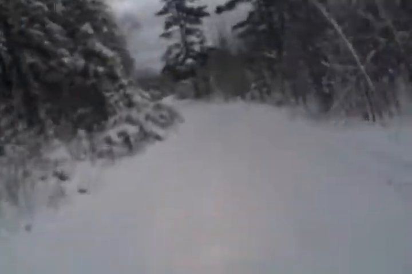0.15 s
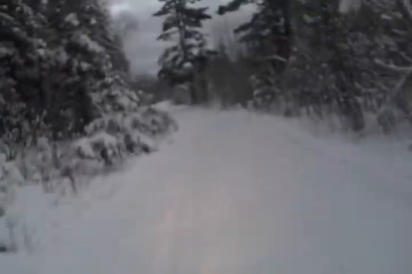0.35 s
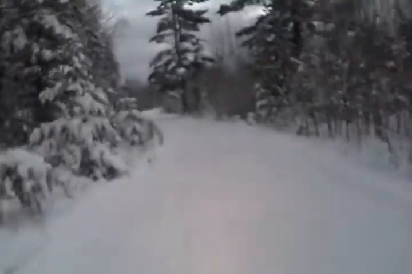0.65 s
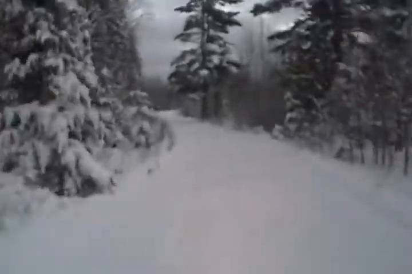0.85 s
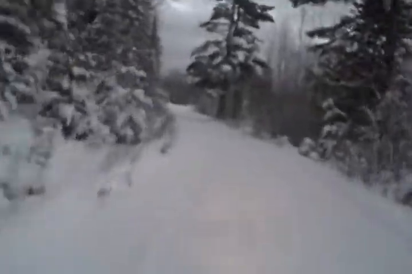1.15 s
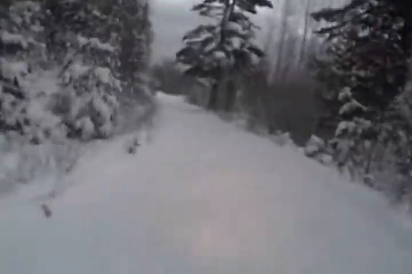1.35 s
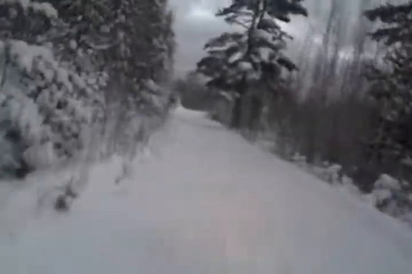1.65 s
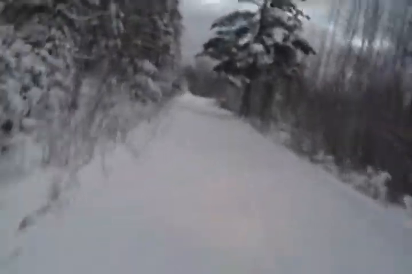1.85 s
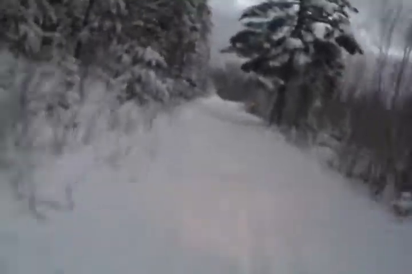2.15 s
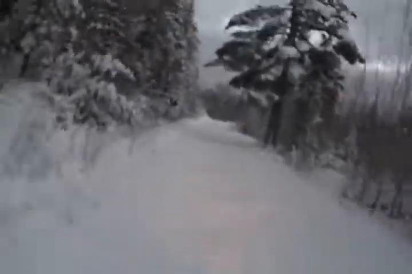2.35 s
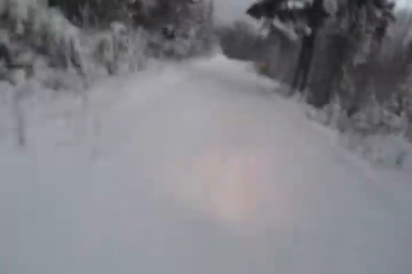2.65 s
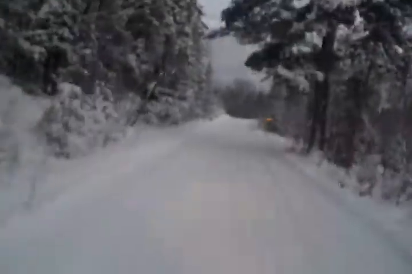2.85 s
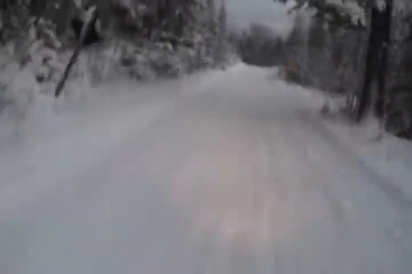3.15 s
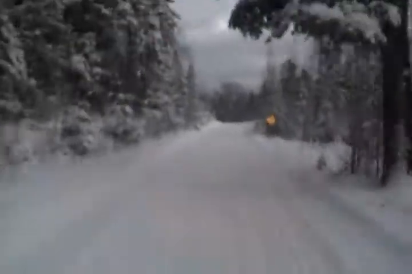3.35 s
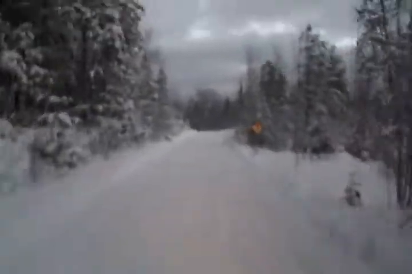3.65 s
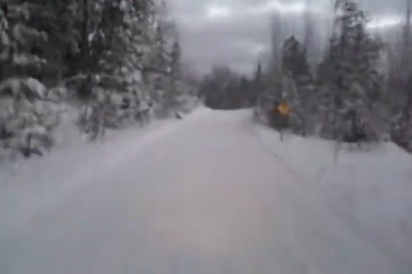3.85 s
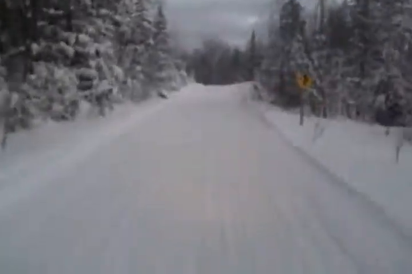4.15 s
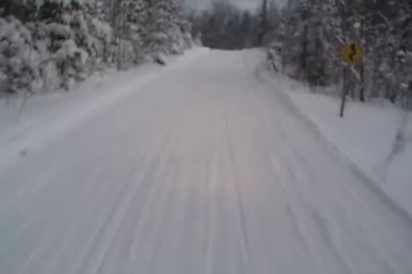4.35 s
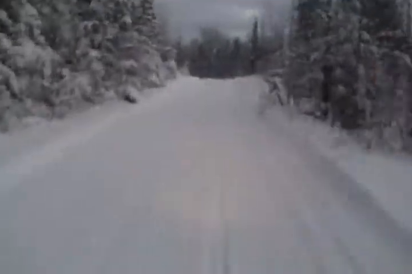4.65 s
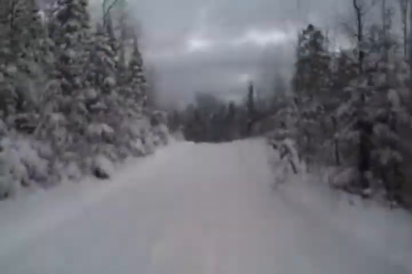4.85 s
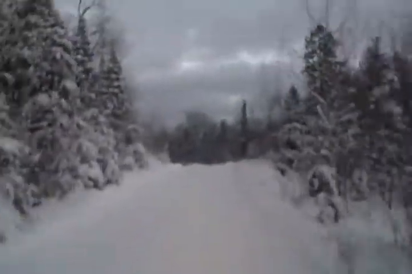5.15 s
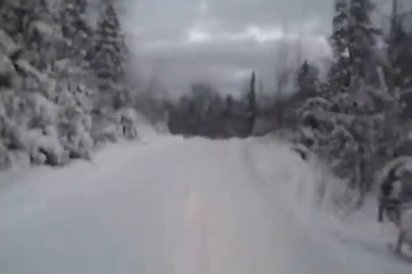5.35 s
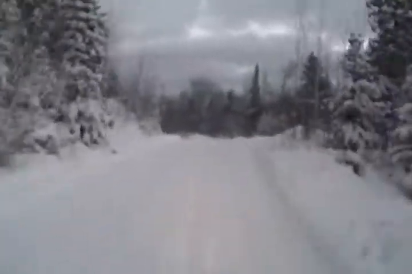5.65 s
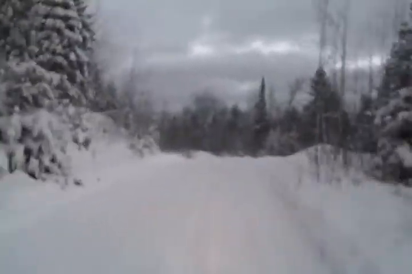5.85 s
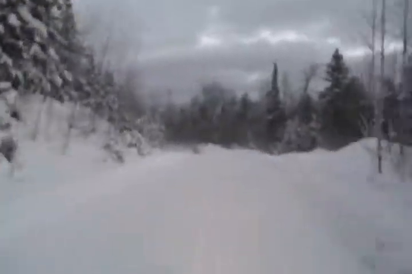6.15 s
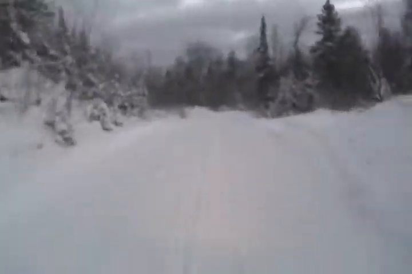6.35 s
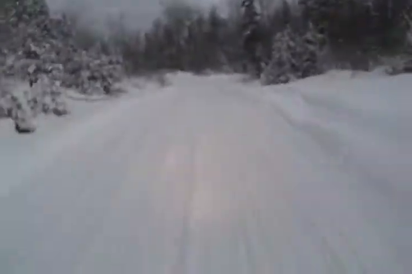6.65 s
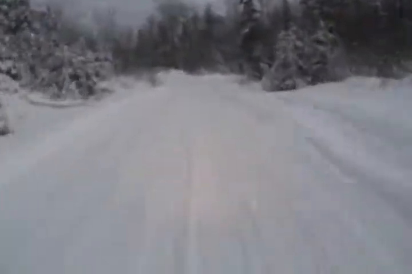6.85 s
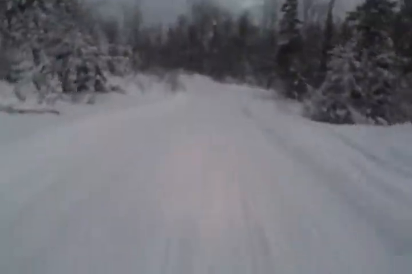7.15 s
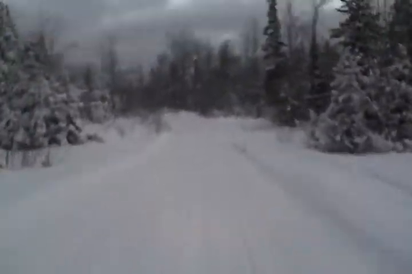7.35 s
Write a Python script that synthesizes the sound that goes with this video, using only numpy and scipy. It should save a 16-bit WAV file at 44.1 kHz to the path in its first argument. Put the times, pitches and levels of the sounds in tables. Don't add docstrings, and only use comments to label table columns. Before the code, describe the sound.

A microphone riding on a snowmobile takes heavy wind from start to finish, 0 to 7.5 seconds. Deep, irregular buffeting and low thuds dominate, with gusts pressing the microphone into short clipped pops and crackles, longest near 3.0 and 3.4 s. Beneath runs a continuous two-stroke engine: a nasal, gritty drone around 100 turns per second with rough exhaust roar, rising in pitch over the first 2 seconds, holding, peaking near 4.7, sagging toward 6.4, then climbing again. The track adds an unsteady low hum, pulsing with bumps and rising until about 4.8. Dull panel knocks come around 2.1 to 2.3, 2.8, 3.25, 5.5 and 6.35. Skis and a metal runner give a thin high hiss, strongest mid-ride. Hard gusts briefly duck the machine, notably 2.2, 2.8, 3.3 and 3.9. Wind thumps thicken after 5.8. It stops mid-ride, outdoors and dry.

```python
import sys
import numpy as np
from scipy import signal
from scipy.fft import rfft, irfft, next_fast_len
from scipy.io import wavfile
from scipy.ndimage import uniform_filter1d

SR = 44100
rng = np.random.default_rng(int(sys.argv[2]) if len(sys.argv) > 2 else 0)


def elevation(decibels):
    levels = np.asarray(decibels, float)
    return 10 ** (levels / 20)


def store_pcm(level_fs):
    pcm = np.round(np.clip(level_fs, -1, 1) * 32767).astype(np.int16)
    wavfile.write(sys.argv[1], SR, np.atleast_2d(pcm).T)


N = 331083

# frequency in Hz, level in dB rms.
CLOCK_TONES = [(1997, -86), (4000, -79), (5001, -99), (6002, -91), (8005, -90), (10006, -108),
               (12009, -103), (14001, -109)]
# frequency in Hz, density in dB per Hz.
CIRCUIT_NOISE = [(300, 4), (2000, 0), (7500, -5), (8500, -10), (9500, -34), (11000, -21), (15600, -21)]

# time in seconds, level in dB.
GUSTS = [(0, -14), (.12, -2.5), (.25, -4.5), (1, 4), (1.4, -0.5), (1.75, 2), (1.9, 4), (2.1, -3.5),
         (2.75, -2), (3.56, -6), (3.95, 3.5), (4.35, -5), (4.7, 4.5), (5.1, 0), (5.5, 0), (6.1, 3.5),
         (6.8, 2), (7.51, 0)]
# frequency in Hz, density in dB per Hz.
BUFFET_SPECTRUM = [(1, -24), (3, -7.5), (5, -3.5), (12, -0.5), (30, -4), (55, -13), (90, -27.5)]
# frequency in Hz, density in dB per Hz.
FLUTTER_SPECTRUM = [(30, -19), (55, 2), (100, -2.5), (150, -8.5), (250, -29.5), (600, -52.5)]
# time in seconds, change in dB.
EDDIES = [(0.033, -4), (0.242, 11), (0.33, -7.5), (0.442, -2), (0.615, -7.5), (0.786, 0.5), (0.905, 0.5),
          (0.96, 3), (1.006, 1.5), (1.235, 1), (1.273, -5), (1.414, 1.5), (1.526, 9.5), (1.779, 4),
          (1.921, 0), (2.039, 2.5), (2.208, -8), (2.376, 4.5), (2.412, -6), (2.498, 5), (2.858, -9),
          (3.349, 0.5), (3.415, 3.5), (3.53, 9.5), (3.694, -5), (3.836, -0.5), (4.027, 1), (4.08, -8),
          (4.186, 5), (4.334, 1), (4.417, 5.5), (4.504, -9), (4.671, 6), (4.85, -2.5), (4.925, 0),
          (5.192, 6.5), (5.276, -2.5), (5.313, 13), (5.435, -1), (5.489, -1.5), (5.674, 7.5), (5.721, -3),
          (5.94, 4.5), (5.977, -3.5), (6.029, -4), (6.074, -3), (6.134, 4.5), (6.438, -7), (6.492, 5),
          (6.528, -2.5), (6.643, 4.5), (6.74, -2.5), (6.781, 5), (6.983, 6), (7.088, -2), (7.304, 5.5),
          (7.38, -3.5), (7.459, 3)]
# time in seconds, peak in dB, frequency in Hz.
BURSTS = [(0.236, -22, 105), (0.477, -22, 137), (0.568, -22.7, 93), (0.679, -23.5, 101), (0.783, -20, 52),
          (0.925, -26, 101), (1.001, -18.9, 82), (1.041, -20, 39), (1.056, -26, 115), (1.233, -26, 58),
          (1.331, -23.4, 137), (1.41, -21, 106), (1.511, -23.6, 120), (1.58, -23.1, 106), (1.709, -29, 60),
          (1.732, -23, 121), (1.766, -21, 44), (1.773, -20.5, 111.5), (2.101, -28, 110), (2.319, -23, 110),
          (2.375, -18, 97.6), (2.498, -25, 60), (2.579, -23.1, 85), (2.642, -18.5, 97), (2.692, -21, 126),
          (2.795, -25.0, 101), (3.045, -25.6, 85), (3.083, -26, 106), (3.161, -24.1, 38.8),
          (3.169, -27, 66), (3.829, -17.5, 43), (4.023, -17.5, 63), (4.148, -26, 101), (4.177, -19, 60),
          (4.236, -22, 106), (4.443, -19.5, 108), (4.675, -25, 68.4), (4.728, -17, 33.2), (4.815, -24, 72),
          (4.887, -29, 137), (5.311, -23, 97), (5.564, -20.1, 77.5), (5.637, -24, 82), (5.793, -21, 126),
          (5.849, -20, 78), (5.89, -25, 46), (5.941, -17.5, 78), (5.986, -20, 37.6), (6.128, -16, 96),
          (6.184, -17.5, 97), (6.357, -18.7, 92), (6.468, -22, 106), (6.492, -16, 55), (6.634, -15.6, 47),
          (6.788, -13.5, 51), (6.86, -16, 48.4), (7.055, -12.5, 52.6), (7.122, -24, 55), (7.238, -23, 94),
          (7.296, -13.5, 55.4)]
# time in seconds, share of full scale.
PRESSURE_CRESTS = [(0, -.39), (.16, .12), (.281, .32), (.44, -.1), (.738, -.25), (1.067, .24), (1.275, .12),
                   (1.373, -.26), (1.456, .33), (1.608, .14), (2.079, 0), (2.154, -.4), (2.374, -.03),
                   (2.465, .41), (2.57, -.07), (2.624, .13), (2.832, -.45), (3.8, .15), (3.908, .24),
                   (4.011, -.45), (4.229, .18), (4.367, -.39), (4.598, .55), (4.795, -.42), (4.948, .59),
                   (5.729, -.45), (5.835, -.16), (6.032, .23), (6.143, -.28), (6.357, -.22), (6.407, .2),
                   (6.47, -.32), (6.599, .17), (6.892, .39), (7.168, .13), (7.295, .17), (7.366, -.03)]
# start in seconds, length in ms, share of the rail (1 = held flat).
RAIL_HITS = [(.083, 5, .93), (0.09, 19, 1), (.11, 2, .95), (0.481, 3, -.97), (0.486, 6, -1), (.494, 3, -1),
             (0.515, 9, -1), (.527, 2, -1), (.536, 4, -1), (0.621, 14, 0.97), (0.827, 13, 0.9),
             (0.973, 9, -1), (.984, 3, -.97), (1.122, 1, -.96), (1.52, 2, -.93), (1.535, 7, -1),
             (1.544, 2, -.97), (1.681, 14, -0.9), (1.798, 17, 1), (1.821, 5, 1), (1.847, 10, 0.85),
             (1.875, 2, .95), (1.957, 31, -1), (1.993, 3, -.97), (1.997, 3, -.95), (2.259, 2, .97),
             (2.266, 1, .94), (2.726, 4, -.95), (2.737, 21, -1), (2.765, 4, -1), (2.943, 4, .97),
             (2.948, 78, 1), (3.027, 6, 1), (3.175, 5, -.98), (3.182, 4, -.9), (3.188, 43, -1),
             (3.232, 9, -1), (3.243, 6, -.96), (3.423, 12, 1), (3.435, 3, .97), (3.44, 59, 1),
             (3.503, 10, 1), (3.651, 33, -1), (5.106, 7, -.95), (5.115, 25, -1), (5.277, 6, .94),
             (5.501, 2, -0.9), (5.508, 5, -.95), (5.572, 10, .85), (5.587, 16, 1), (5.623, 4, .95),
             (5.644, 8, 0.92), (5.764, 2, -.88), (5.933, 4, -.97), (6.223, 14, 1), (6.246, 5, 1),
             (6.685, 11, -0.9), (7.067, 2, -.92), (7.237, 2, -.92), (7.434, 8, 1), (7.455, 5, .9),
             (7.498, 12, 1)]
# time in seconds, gain in dB.
GAIN_DRIFT = [(0, -33.5), (.8, -33), (1.65, -31.5), (2.0, -33.5), (2.75, -32.5), (3.1, -34), (3.75, -37),
              (4.3, -36.5), (5.05, -37), (5.4, -36), (5.56, -30.5), (5.75, -33), (5.95, -32.5), (6.6, -34),
              (6.97, -34.5), (7.2, -31.5), (7.51, -34)]
# time in seconds, depth in dB, recovery in seconds.
GAIN_DIPS = [(.03, -1, 0.13), (.75, 1.5, 0.032), (.93, 0.5, 0.053), (1.884, 2.5, 0.016),
             (2.179, 11.5, 0.02), (2.6, 3, 0.043), (2.831, 9, 0.068), (3.06, 3, 0.073), (3.251, 7.5, 0.12),
             (3.318, 9, 0.025), (3.519, 6.5, 0.065), (3.877, 9, 0.0046), (3.924, 13, 0.0059),
             (4.2, 2, 0.058), (4.524, 3, 0.031), (5.0, 1, 0.023), (5.141, 9.5, 0.05), (5.199, 6, 0.015),
             (5.658, 5.5, 0.029), (6.335, -3, 0.0091), (6.395, 1.5, 0.08), (7.4, 0.5, 0.024)]

# frequency in Hz, density in dB per Hz.
SKI_HISS = [(2500, -13.5), (3800, 5), (4600, -3), (5500, -3.5), (6200, -4.5), (6900, -1.5), (7300, -4),
            (8600, -5.5)]
# frequency in Hz, density in dB per Hz.
RUNNER_SIZZLE = [(5700, -25), (6050, -4), (6250, 0), (6500, -4), (6900, -25)]
# time in seconds, peak in dB, frequency in Hz.
JOLTS = [(1.68, 7.5, 490), (1.92, 3, 508), (2.097, 15.5, 285), (2.32, 14, 269), (2.792, 17, 294),
         (3.186, 5, 622), (3.251, 7, 486), (3.256, 17, 287), (3.285, 18.5, 280), (5.52, 11.5, 195.6),
         (6.349, -3.5, 1065), (6.349, 11, 188)]
# time in seconds, change in dB.
TRAIL_BUMPS = [(0.201, 3.5), (0.341, -6), (0.468, 4), (.63, 2), (0.733, 3.5), (.83, 4), (1.102, 5.5),
               (1.288, 6), (1.365, -10), (1.47, 6), (1.646, -12), (1.759, 5), (1.835, -2), (1.871, -7),
               (2.003, 7.5), (2.061, -10.5), (2.109, 4), (2.222, 5.5), (2.284, -6), (2.32, -1), (2.484, -8),
               (2.655, 4), (2.797, 4), (2.916, 8), (3.127, 2.5), (3.277, 5.5), (3.377, -2.5), (3.625, 6.5),
               (3.777, -4.5), (3.902, 5.5), (3.997, 9), (4.097, -8), (4.174, -3), (4.241, 6), (4.343, 2),
               (4.452, 3), (4.525, -4.9), (4.754, -7), (4.795, 3.1), (4.883, 6.5), (4.974, 2.5),
               (5.212, -12), (5.325, 7.5), (5.65, 4.5), (5.744, 6), (5.845, -7), (5.939, 0.5), (6.013, -18),
               (6.113, 2), (6.354, 4.5), (6.412, -16), (6.512, 1), (6.65, 7), (6.817, 0), (6.876, 3),
               (7.023, -6), (7.19, 8), (7.372, 1.5), (7.417, -6), (7.457, 6.5)]

# time in seconds, crank turns in Hz, track lug rate in Hz.
SPEEDS = [(0.0, 95.6, 221.0), (0.3, 95.6, 222), (0.75, 97.0, 228.8), (1.25, 101.0, 238.3),
          (1.75, 104.1, 244), (2.25, 104.5, 253.4), (2.6, 103.7, 258.5), (3.25, 104.1, 261.7),
          (3.6, 103.5, 267), (4.2, 103.8, 270.8), (4.55, 106, 276.3), (4.8, 106, 277.4), (5.25, 104.1, 275),
          (5.6, 102.2, 274), (6.0, 99.4, 265.5), (6.45, 96.2, 261), (6.85, 98.2, 252.5), (7.4, 101.7, 254)]
# time in seconds, drone in dB, throttle bite in dB per octave, track grip in dB.
LOADS = [(0, -13.5, -0.5, 11.5), (.5, -12.5, -3.5, 8.5), (1, -12.5, 1, 6.5), (1.6, -13, -2.5, 3.5),
         (2, -12, -1, 3), (2.6, -13, -0.5, 1.5), (3.4, -12.5, -2, 1), (4.3, -12.5, -1.5, 4.5),
         (5.4, -13, -1.5, 4), (6, -12.5, -0.5, 5), (6.5, -17.5, 1.5, 5.5), (7, -12.5, 2, -4),
         (7.51, -12.5, -4, 6.5)]
# frequency in Hz, width in Hz, level in dB.
CAN_MODES = [(99.3, 16, 10), (220.4, 50, 11), (381.6, 4.8, 4.5), (554, 4.3, -1.5), (606.5, 10, 2.5),
             (768.5, 64, 3), (803, 140, 1.5), (999, 16, -0.5), (1120, 11, -4.5), (1246, 51, 0),
             (1323, 20, -0.5), (1421, 29, 1.5), (1510, 12, -5.5), (1632, 63, -8), (1720, 12, -6),
             (1730, 40, -10), (1944, 31, -8), (2120, 63, -11.5)]
# frequency in Hz, width in Hz, level in dB.
HOOD_MODES = [(2050, 120, -6.5), (2710, 250, -8.5), (3495, 140, -1.5)]
# frequency in Hz, density in dB per Hz.
ROAR_SPECTRUM = [(100, -3.5), (170, 8.5), (260, 7), (360, 0), (700, -5.5), (1270, -10.5), (1600, -16.5),
                 (2050, -21), (2300, -23.5), (3000, -25), (3500, -31.5), (3900, -36.5), (6000, -39.5)]
# multiple, start and end in seconds, change in dB.
FAVOURED = [(2, .8, 1.6, 5), (2, 2.3, 2.7, -4), (2, 5.6, 5.9, -4), (4, 0, .95, 3), (5, 6.5, 6.8, -4),
            (6, 6.5, 6.8, -4), (5, .9, 1.9, 4), (5, 3.6, 4.9, 6), (6, .9, 1.5, -5), (7, 1.9, 3, 3),
            (7, 3.7, 5.2, 1.5), (7, 5.4, 7.5, -4), (8, .4, 1.3, -4), (8, 1.9, 3.1, -2), (8, 3.7, 4.9, -1),
            (8, 4.9, 5.6, 2), (8, 5.7, 6.4, -4), (6, 5.4, 6, 4), (17, 5.4, 6, -3), (8, 6.9, 7.5, -3),
            (9, 0, .7, -5), (9, 1.2, 5.2, 2), (10, 0, .6, -5), (10, 1.2, 5.2, -11), (10, 5.4, 6.25, 4),
            (10, 6.25, 6.9, 7), (10, 6.9, 7.3, 2), (11, .6, 2.4, 4), (11, 3.3, 4.5, 3), (11, 6.3, 7, 6),
            (11, 7, 7.5, 3), (12, 0, .6, -3), (12, 1, 1.6, 2), (12, 3.6, 4.9, 5), (12, 6.6, 7.2, -4),
            (13, 3.3, 4.5, 4), (13, 5.3, 6, 4), (13, 6.6, 7.5, 3), (14, .3, 1.2, 4), (14, 2.4, 3.6, -6),
            (14, 3.6, 4.2, -4), (14, 6.9, 7.5, -5), (15, 3.9, 5.2, -6), (15, 6.3, 6.9, 4), (16, 0, .6, 5),
            (16, 1, 1.9, -5), (16, 1.9, 4.5, -5), (17, 6, 6.9, 8), (19, .9, 6, -3), (19, 6, 6.7, 7),
            (19, 6.7, 7.5, -3), (20, 6.6, 7.05, 3)]

RAIL, TOP_HZ = .703, 8500
CRUISE_HZ = 250
CONTROL = 20


def unit(x):
    return x / np.sqrt(np.mean(x ** 2) + 1e-20)


def curves(rows):
    s, *cols = np.transpose(rows)
    return [np.interp(np.arange(N) / SR, s, c) for c in cols]


def wobble(rate, hop=1):
    knots = rng.standard_normal(int(N * rate / SR) + 4)
    return np.interp(np.arange(0, N, hop) * rate / SR, np.arange(len(knots)), knots)


def smooth(x, seconds):
    size = int(seconds * SR)
    once = uniform_filter1d(x, size=size, mode="nearest")
    return uniform_filter1d(once, size=size, mode="nearest")


def filtered(x, response):
    m = next_fast_len(N + SR // 2)
    return irfft(rfft(x, m) * response(np.fft.rfftfreq(m, 1 / SR)), m)[..., :N]


def rush(spectrum, patchy_db):
    z = signal.stft(rng.standard_normal(N + SR), nperseg=512)[2]
    field = uniform_filter1d(rng.standard_normal(z.shape), size=5, axis=0)
    field = uniform_filter1d(field, size=10, axis=1)
    noise = signal.istft(z * elevation(patchy_db * unit(field)), nperseg=512)[1][:N]
    f, level = np.transpose(spectrum)

    def colour(hz):
        return elevation(np.interp(np.log(hz + 0.063), np.log(f), level, -120, -120))
    return unit(filtered(noise, colour))


def swells_db(rows, half_length_s):
    s, db = np.transpose(rows)
    strikes = np.bincount((s * SR).astype(int), db, N)
    return smooth(strikes, half_length_s) * int(half_length_s * SR)


def speed_hz():
    return curves(SPEEDS)[1] - CRUISE_HZ


def converter(flat):
    t = np.arange(N) / SR
    tones = sum(np.sqrt(2) * elevation(db) * np.sin(2 * np.pi * hz * t) for hz, db in CLOCK_TONES)
    swing = .25 + .75 * smooth((flat / RAIL) ** 2, .01)
    return swing * (swing * tones + elevation(-80) * rush(CIRCUIT_NOISE, patchy_db=1))


def heave():
    push = .52
    held = [(s + end * ms / 1000, reach * push) for s, ms, reach in RAIL_HITS for end in (0, 1)]
    return smooth(curves(sorted(PRESSURE_CRESTS + held))[0], .02)


def eddies_db():
    return swells_db(EDDIES, 0.027)


def buffet():
    gust_db = curves(GUSTS)[0]
    patches = elevation(0.36 * eddies_db() + 2.4 * wobble(11.0))
    return elevation(17.5 + 0.98 * gust_db) * unit(patches * rush(BUFFET_SPECTRUM, patchy_db=1.5))


def flutter():
    gust_db = curves(GUSTS)[0]
    patches = elevation(0.83 * eddies_db() + 1.8 * wobble(17))
    return elevation(8 + 0.4 * gust_db) * unit(patches * rush(FLUTTER_SPECTRUM, patchy_db=0.5))


def thuds():
    half_cycles, trim_db = 1.67, -1
    out, t = np.zeros(N), np.arange(-4000, 4000) / SR
    for (s, db, hz), start in zip(BURSTS, rng.random(len(BURSTS))):
        swell = np.exp(-(t * hz / half_cycles) ** 2) * np.sin(2 * np.pi * (hz * t + start))
        out[int(s * SR) - len(t) // 2:][:len(t)] += elevation(db + trim_db) * swell
    return out


def snow():
    speed = speed_hz()
    hiss_db, sizzle_db = -29 + 0.0432 * speed, -9.5 + 0.0926 * speed
    hiss = rush(SKI_HISS, patchy_db=1.4)
    sizzle = elevation(sizzle_db) * rush(RUNNER_SIZZLE, patchy_db=2.0)
    return elevation(hiss_db) * (hiss + sizzle)


def chassis():
    out, t = np.zeros(N), np.arange(-2000, 2000) / SR
    for s, db, hz in JOLTS:
        jolt = np.exp(-(t / 0.013) ** 2) * np.sin(2 * np.pi * hz * t)
        out[int(s * SR) - len(t) // 2:][:len(t)] += elevation(db) * jolt
    return out


def track():
    speed, grip_db = speed_hz(), curves(LOADS)[2]
    overtone_db = -12 - .07 * speed
    jitter = .012 + .0003 * speed
    phase = 2 * np.pi * np.cumsum(curves(SPEEDS)[1] * (1 + jitter * wobble(40))) / SR
    hum = np.sin(phase) * elevation(1.1 * wobble(30))
    octave = np.sin(2 * phase) * elevation(overtone_db + 2.2 * wobble(14))
    skipping = elevation(1.07 * swells_db(TRAIL_BUMPS, 0.037))
    return elevation(grip_db) * skipping * (hum + octave)


def favoured_db(k):
    t = np.arange(0, N, CONTROL) / SR
    total = 0 * t
    for multiple, start, end, db in FAVOURED:
        if multiple == k:
            total = total + db * np.clip(np.minimum(t - start, end - t) / .1 + .5, 0, 1)
    return total


def exhaust_drone(turn, turns_hz, bite_db):
    grid = np.arange(3500.)
    power = sum(elevation(db) ** 2 / (1 + (2 * (grid - hz) / width) ** 2) for hz, width, db in CAN_MODES)
    can = np.sqrt(power)
    drone = np.zeros(N)
    for k in range(1, 25):
        fan = k == 10
        favour_db = favoured_db(k)
        steadied = np.clip(1 - .12 * favour_db, .4, 1)
        level_db = bite_db[::CONTROL] * np.log2(k / 8) + 3 * fan + favour_db
        uneven_db = .8 * wobble(4, CONTROL) + (2.8 - fan) * steadied * wobble(13, CONTROL)
        level = np.interp(k * turns_hz[::CONTROL], grid, can) * elevation(level_db + uneven_db)
        drone += np.repeat(level, CONTROL)[:N] * np.sin(k * turn + k * k * .9 + rng.random())
    return drone


def exhaust_roar(turn):
    def hood(f):
        return 1 + sum(elevation(db) / (1 + (2 * (f - hz) / width) ** 2) for hz, width, db in HOOD_MODES)
    firing = 1 + .13 * np.cos(turn) + .06 * np.cos(2 * turn)
    gate = unit(firing * elevation(0.31 * wobble(30)))
    return gate * filtered(rush(ROAR_SPECTRUM, patchy_db=1.36), hood)


def engine():
    turns_hz = curves(SPEEDS)[0]
    drone_db, bite_db = curves(LOADS)[:2]
    turn = 2 * np.pi * np.cumsum(turns_hz * (1 + .002 * wobble(14))) / SR
    return elevation(drone_db) * exhaust_drone(turn, turns_hz, bite_db) + elevation(4.5) * exhaust_roar(turn)


def gain_db():
    attack_s = 0.018
    t = np.arange(0, N, CONTROL) / SR
    dips = np.zeros(len(t))
    for s, db, recovery_s in GAIN_DIPS:
        fall = np.exp(-((t - s) / min(attack_s, recovery_s)) ** 2)
        ease = np.exp(-np.abs(t - s) / recovery_s)
        dips += db * np.where(t < s, fall, ease)
    return curves(GAIN_DRIFT)[0] - np.repeat(dips, CONTROL)[:N]


def overloaded(x, audible):
    x = x / (1 + np.abs(x / .6) ** 6) ** (1 / 6)
    for s, ms, reach in RAIL_HITS:
        end = s + ms / 1000
        span = np.arange(int((s - .03) * SR), min(N, int((end + .03) * SR)))
        inside = np.minimum(span / SR - s, end - span / SR)
        near = smooth(np.clip(1 + inside / .006, 0, 1), .003)
        beyond = int(reach) * np.clip(inside / .0015, 0, 1) * .35
        x[span] += near * (reach * RAIL - x[span]) + beyond
    return x + audible


def scene():
    gain = elevation(gain_db())
    wind = heave() + gain * (buffet() + flutter()) + thuds()
    machine = gain * (snow() + chassis() + track() + engine())
    return overloaded(wind, machine)[None]


def top_cut(x):
    return signal.sosfilt(signal.butter(12, 15700, fs=SR, output="sos"), x)


def record(dry):
    slow = smooth(dry, .001)
    limited = slow + filtered(dry - slow, lambda hz: elevation(-np.clip(hz - TOP_HZ, 0, 400) / 6))
    flat = limited / (1 + np.abs(limited / RAIL) ** 40) ** (1 / 40)
    return top_cut(flat + converter(flat))


dry = scene()
out = record(dry)
store_pcm(out)
```